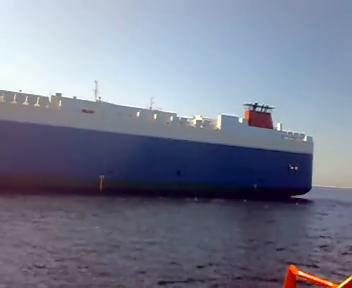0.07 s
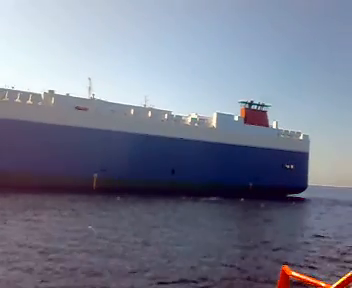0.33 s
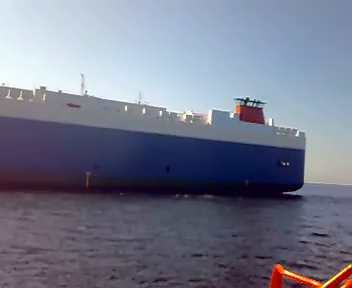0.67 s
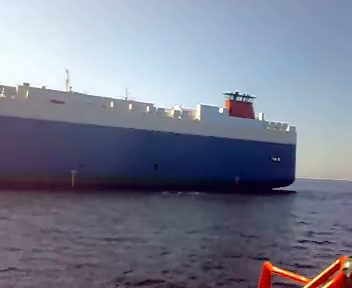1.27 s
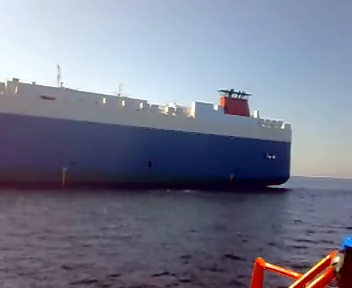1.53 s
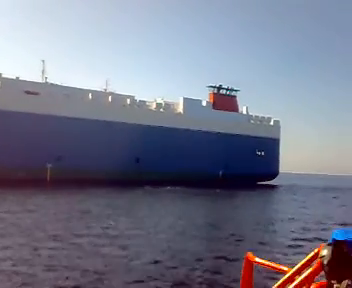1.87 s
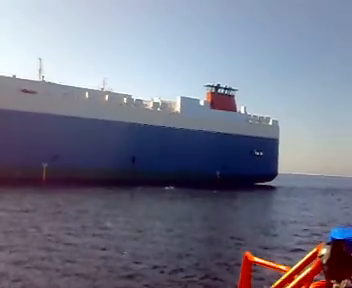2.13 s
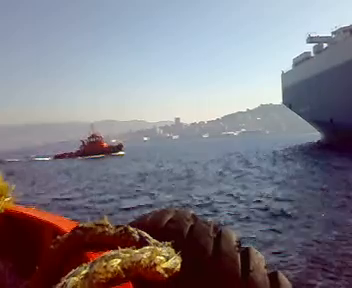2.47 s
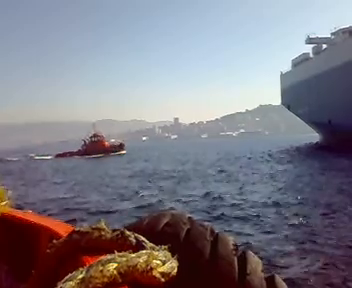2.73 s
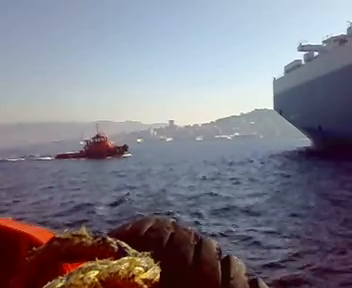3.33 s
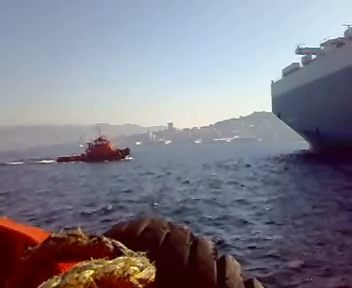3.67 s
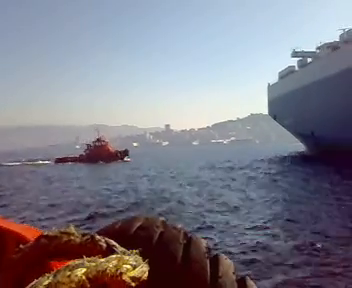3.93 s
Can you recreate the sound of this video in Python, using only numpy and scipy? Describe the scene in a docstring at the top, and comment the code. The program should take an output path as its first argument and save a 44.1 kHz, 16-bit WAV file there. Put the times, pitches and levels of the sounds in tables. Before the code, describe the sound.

A tugboat's diesel engine throbs deeply with a machinery hum, heard on deck over churning water and a light hiss of wind and foam. The throb swells toward 1.9 seconds. A few close plastic handling clacks come between 1.7 and 2.3 seconds, ending in a low thump. The engine surges briefly around 2.6 seconds, then continues as a softer throb and rumble with a thin gear whine until 4 seconds.

```python
"""A deep diesel throb, heard on the deck of a harbour tug, with humming machinery and washing water.
Puffs of exhaust make the pipe ring, the machinery hums through the steel, and wind and foam fizz.
A small camera clacks as it is handled. Just past halfway, with a low thump, the sound cuts from
the side deck to the bow, where the throb is softer and a thin whine of gears comes through."""
import sys
import numpy as np
from scipy import signal
from scipy.fft import rfft, irfft, next_fast_len
from scipy.io import wavfile
from scipy.ndimage import uniform_filter1d, map_coordinates

SR = 44100
rng = np.random.default_rng(int(sys.argv[2]) if len(sys.argv) > 2 else 0)


def store_pcm(level_fs):
    """Save levels as 16-bit WAV."""
    pcm = np.round(np.clip(level_fs, -1, 1) * 32767).astype(np.int16)
    wavfile.write(sys.argv[1], SR, np.atleast_2d(pcm).T)


N = 176400

# How loud the exhaust is over time: t/s, level/dB
EXHAUST_LEVEL = [(0, -27.5), (.6, -26.5), (1.2, -25), (1.5, -23.5), (1.9, -18.7), (2.28, -21.5), (2.4, -26),
                 (2.62, -18.5), (2.85, -30), (3.2, -31.5), (4, -28.5)]


def exhaust(firing_hz, beat_s, pipe, soft_hz, hard_hz):
    """Puffs ring the exhaust pipe; the harder they are, the more of their treble passes the silencer."""
    jitter_s, scatter_db, accent_db = 0.0002, -0.45, 2
    beats = np.arange(-40, 60)  # beat 0 falls at beat_s
    chance = rng.standard_normal((len(beats), 2))
    starts = np.round((beat_s + beats / firing_hz + jitter_s * chance[:, 0]) * SR).astype(int)
    strength = amp(scatter_db * chance[:, 1] + accent_db * (beats % 3 == 0))  # every third is stronger
    heard = (starts >= 0) & (starts < N)
    puffs = np.bincount(starts[heard], strength[heard], N)
    soft = unit(filtered(puffs, lambda f: ringing(pipe)(f) * muffle(f, soft_hz)))
    hard = unit(filtered(puffs, lambda f: ringing(pipe)(f) * muffle(f, hard_hz)))
    loudness = level(EXHAUST_LEVEL)
    hardness = np.interp(loudness, amp([-25.5, -26]), [0, 1])  # picks the dull or the bright puffs
    return loudness * (soft + hardness * (hard - soft))


def side_deck():
    """The engine from the side deck: a strong throb, with hum and rumble that swell a little with it."""
    # Notes at which the exhaust pipe rings: f/Hz, width/Hz, relative level/dB
    pipe = [(51.3, 16, -3.5), (65, 24, 2), (79.3, 23, -1.5)]
    # Hum of the machinery: cycles per turn of the shaft, level/dB
    shaft_hum = [(8, -34.5), (12, -38.5), (13, -43.5), (16, -45), (18, -40.5), (19, -34.5), (20, -34),
                 (23, -33), (24, -39), (25, -37.5), (27, -39), (28, -47)]
    # Steady tones of pumps and gears: f/Hz, level/dB
    pump_tones = [(50.5, -27.5), (91.1, -31.5), (112.4, -42.5), (155, -43.5), (203.6, -32), (220, -37),
                  (405, -44.5), (1140, -47.5)]
    # Broad rumble of the engine room: f/Hz, relative level/dB
    rumble_shape = [(12, -22.5), (25, -10), (45, 1.5), (100, -3.5), (135, -3), (175, -4), (215, 1),
                    (265, -6.5), (320, -2.5), (380, -9.5), (480, -11), (800, -28.5), (2000, -69)]
    shaft_hz = 12.61
    hum = tones([(cycles * shaft_hz, db) for cycles, db in shaft_hum], drift=0.2, flutter_db=2.5)
    pumps = tones(pump_tones, drift=0.097, flutter_db=2.0)
    rumble = amp(-27.5) * rush(rumble_shape, patchy_db=2.5)
    swell = unit(level(EXHAUST_LEVEL) ** 0.27)  # 0.27 dB for each dB of exhaust
    throb = exhaust(firing_hz=16.08, beat_s=1.9, pipe=pipe, soft_hz=69.5, hard_hz=160)
    return throb + swell * (hum + pumps + rumble)


def bow():
    """The engine from the bow: a softer throb, a whine of gears and a steady rumble."""
    # Notes at which the exhaust pipe rings: f/Hz, width/Hz, relative level/dB
    pipe = [(51.7, 17, -3.5), (69.5, 25, 0.5), (118, 28, -11)]
    # Steady tones of pumps and gears: f/Hz, level/dB
    gear_tones = [(92.8, -32.5), (103.5, -34.5), (132.2, -34.5), (138.1, -35.5), (227, -38.5), (386, -42.5),
                  (476.3, -37), (491, -43), (861, -49.5), (985, -49), (1168, -51), (1335, -46.5)]
    # Broad rumble of the engine room: f/Hz, relative level/dB
    rumble_shape = [(12, -8), (25, -7.5), (45, 1.5), (90, 4.5), (125, 3.5), (170, -3.5), (230, -4),
                    (300, -6), (360, -11), (440, -7.5), (500, -5.5), (600, -9), (800, -35.5), (2000, -58.5)]
    gears = tones(gear_tones, drift=0.3, flutter_db=0.5)
    throb = exhaust(firing_hz=16.28, beat_s=2.578, pipe=pipe, soft_hz=160, hard_hz=200)
    rumble = amp(-22.5) * rush(rumble_shape, patchy_db=0.84)
    return throb + gears + rumble


def clacks():
    """Each clack is a short gritty scrape that rings the struck spot and the camera's plastic case."""
    # Knocks on the case as it is handled, and at 2.309 s the camera's click as it restarts: t/s, scrape
    # length/s, level/dB, treble/dB, spot's pitch/Hz, treble limit/Hz
    knocks = [(1.6905, 0.001, -12.5, -9, 1980, 5350), (1.808, 0.002, -16, -8, 2000, 6000),
              (1.812, 0.0082, -17, 2, 1430, 7300), (1.823, 0.0026, -19, -12, 760, 4000),
              (2.053, 0.01, -29.5, -3, 1740, 6600), (2.077, 0.0135, -36, -2, 1720, 6000),
              (2.176, 0.0036, -17, -13, 1840, 4000), (2.182, 0.0058, -19, -8, 1350, 6230),
              (2.192, 0.0148, -33.5, -6.5, 1760, 6500), (2.309, 0.00084, -25, -13, 1300, 4030),
              (3.82, 0.02, -47.5, 5, 1750, 6940)]
    # Lower and higher notes at which the case rings: f/Hz, width/Hz, relative level/dB
    case_low = [(950, 680, -10.5), (1480, 260, -6), (1760, 160, -2), (2120, 150, 1.5), (3010, 190, -9.5)]
    case_high = [(4160, 1070, -4), (4850, 210, 6.5), (5620, 240, 3.5), (5950, 160, 4.5), (6170, 190, 11),
                 (6600, 180, 2)]
    scrape_fade_s, tail_fade_s = 0.018, 0.076  # time to fall by 60 dB
    tail_db, spot_db, crack_db, spot_width_hz = -27, -5.5, -13, 100
    t = clock()
    out = np.zeros(N)
    for start, length, db, treble_db, spot_hz, top_hz in knocks:
        after = np.maximum(t - start - length, 0)
        stroke = (t >= start) * (amp(-60 * after / scrape_fade_s) + amp(tail_db - 60 * after / tail_fade_s))
        grit = stroke * rng.standard_normal(N)
        spot = unit(filtered(grit, ringing([(spot_hz, spot_width_hz, 0)])))
        case = unit(filtered(stroke * rng.standard_normal(N), ringing(case_low)))
        low = unit(case + amp(spot_db) * spot)
        high = unit(filtered(grit, lambda f: ringing(case_high)(f) * muffle(f, top_hz)))
        crack = unit(filtered(grit, lambda f: muffle(f, top_hz)))
        gain = amp(db) * np.sqrt(length * SR / N)  # a longer scrape carries more energy
        out += gain * (low + amp(treble_db) * high + amp(crack_db) * crack)
    return out


def thump():
    """A low thump as the camera restarts at the cut: one big swing that slows as it dies away."""
    start_s, start_hz, start_db = 2.3017, 135, 1
    sag_s, fade_s = 0.0036, 0.18  # time for the pitch to halve, and for the level to fall by 60 dB
    t = np.maximum(clock() - start_s, 0)
    swing = -np.sin(2 * np.pi * start_hz * sag_s * np.log1p(t / sag_s))
    return amp(start_db - 60 * t / fade_s) * swing


def water():
    """The churning wake behind the boat, with the fizz of foam and wind above it."""
    # Tone colour of the wake and of the fizz: f/Hz, relative level/dB
    wake_shape = [(100, -19.5), (350, -2.5), (560, 2.5), (750, 0), (950, 0.5), (1100, -1.5), (1350, -2),
                  (1550, -3), (1800, -5), (2150, -10.5), (2600, -18), (4000, -35.5), (8000, -62.5)]
    fizz_shape = [(500, -22.5), (1800, 2), (2800, 0), (3600, 1.5), (4500, 0.5), (5300, -2.5), (6200, -2.5),
                  (7000, -4), (7500, -9.5), (7800, -33.5)]
    # How loud each is over time: t/s, level/dB
    wake_level = [(0, -29), (.7, -30), (1.5, -31), (1.9, -29), (2.28, -29), (2.4, -28.5), (3.15, -30),
                  (3.65, -27.5), (4, -29.5)]
    fizz_level = [(0, -38.5), (.25, -37.5), (.7, -39.5), (1.2, -41), (1.35, -43), (1.6, -43.5), (1.8, -41),
                  (2.4, -41), (2.65, -42), (2.88, -39.5), (3, -42.5), (3.3, -42), (3.52, -38.5), (4, -42)]
    wake = level(wake_level) * rush(wake_shape, patchy_db=1.05)
    fizz = level(fizz_level) * rush(fizz_shape, patchy_db=0.76)
    return wake + fizz


def tones(rows, drift, flutter_db):
    """Machine tones from (f/Hz, level/dB) rows, each a little unsteady in pitch and loudness."""
    out = np.zeros(N)
    for hz, db in rows:
        phase = 2 * np.pi * (hz * clock() + rng.random()) + drift * wobble(4.5)
        out += amp(db) * unit(amp(flutter_db * wobble(7)) * np.sin(phase))
    return out


def rush(shape, patchy_db):
    """Rushing noise of a given tone colour, with random louder and quieter patches."""
    grid = signal.stft(rng.standard_normal(N), nperseg=512)[2]  # noise laid out by pitch and time
    patches = uniform_filter1d(rng.standard_normal(grid.shape), size=4, axis=0)
    patches = uniform_filter1d(patches, size=10, axis=1)
    noise = signal.istft(grid * amp(patchy_db * unit(patches)), nperseg=512)[1][:N]
    hz, db = np.transpose(shape)
    return unit(filtered(noise, lambda f: amp(np.interp(np.log(f + 1), np.log(hz), db))))


def ringing(notes):
    """The filter curve of an object that rings at (f/Hz, width/Hz, level/dB) notes."""
    return lambda f: sum((-1) ** k * amp(db) * 1j * f * width / (hz * hz - f * f + 1j * f * width)
                         for k, (hz, width, db) in enumerate(notes))


def muffle(f, corner_hz):
    """A filter curve that falls steeply above corner_hz."""
    return 1 / (1 + (f / corner_hz) ** 8)


def filtered(x, curve):
    """Pass x through a filter, given as a curve over frequency."""
    size = next_fast_len(N + SR // 2)
    return irfft(rfft(x, size) * curve(np.fft.rfftfreq(size, 1 / SR)), size)[:N]


def wobble(rate):
    """A smooth curve through `rate` random points a second."""
    return map_coordinates(rng.standard_normal(1024), [clock() * rate], mode="wrap")


def level(rows):
    """A gain for every sample from (t/s, level/dB) points."""
    return amp(np.interp(clock(), *np.transpose(rows)))


def amp(db):
    """Turn decibels into a gain."""
    return 10 ** (np.asarray(db) / 20)


def unit(x):
    """Scale x to an average (rms) size of 1."""
    return x / np.sqrt(np.mean(x ** 2) + 1e-20)


def clock():
    """The time of every sample, in seconds."""
    return np.arange(N) / SR


def scene():
    """First the side deck, then the bow, with water all along; the level dips briefly at the cut."""
    cut_s, dip_s, dip_db = 2.297, 0.012, -17
    t = clock()
    dip = np.where((t > cut_s) & (t < cut_s + dip_s), amp(dip_db), 1)
    boat = np.where(t < cut_s, side_deck(), bow()) + water()
    return (uniform_filter1d(dip, size=64) * boat + clacks() + thump())[None]


def record(dry):
    """The camera rounds off the biggest peaks and drops the highest treble."""
    ceiling, top_hz = 0.72, 7800
    rounded = dry[0] / (1 + (dry[0] / ceiling) ** 8) ** (1 / 8)
    return filtered(rounded, lambda f: np.clip((top_hz - f) / 200, 0, 1))[None]


dry = scene()
out = record(dry)
store_pcm(out)
```